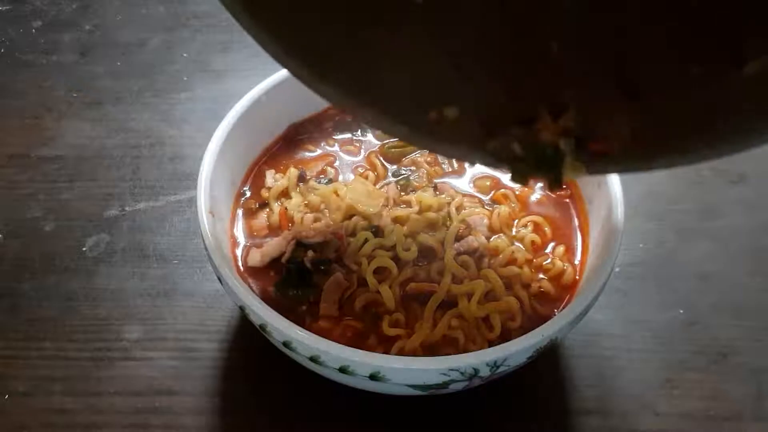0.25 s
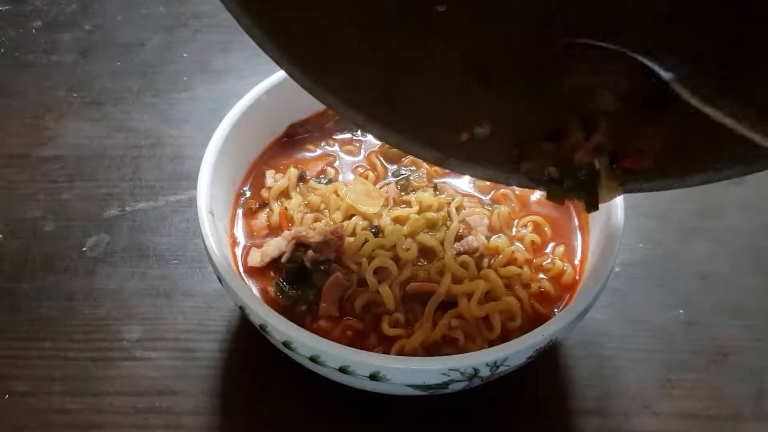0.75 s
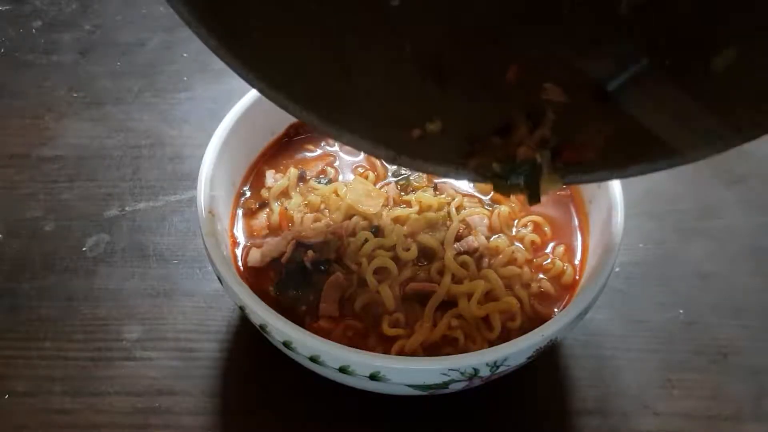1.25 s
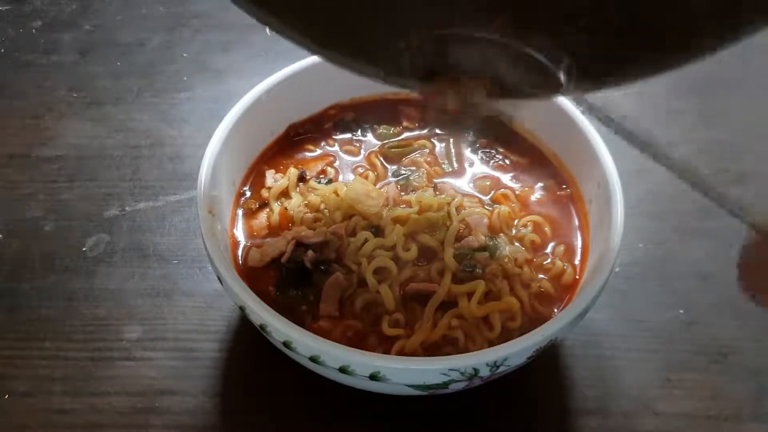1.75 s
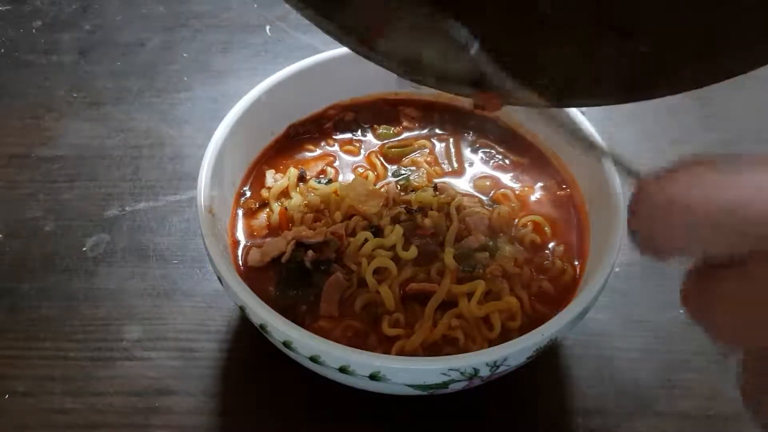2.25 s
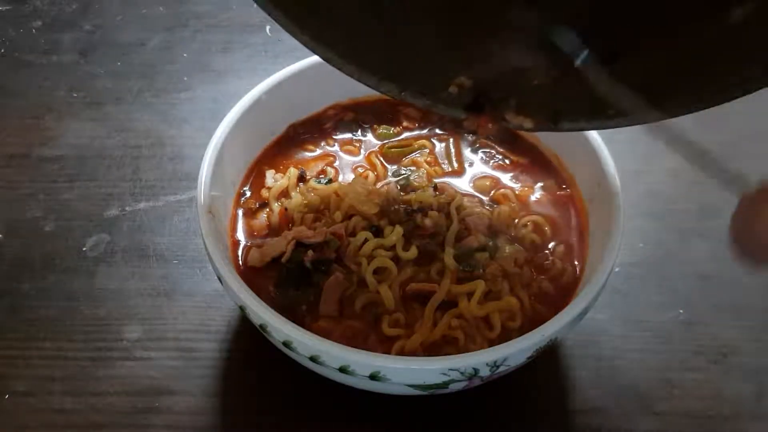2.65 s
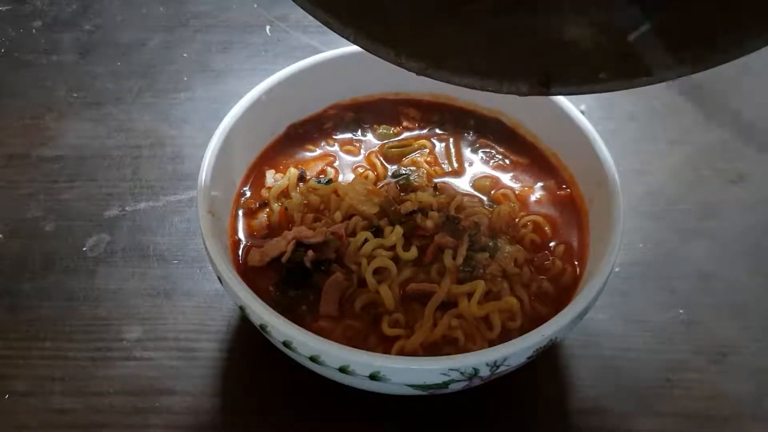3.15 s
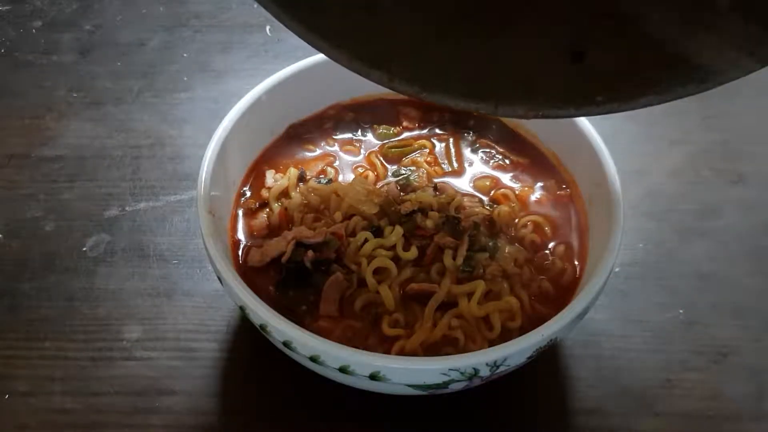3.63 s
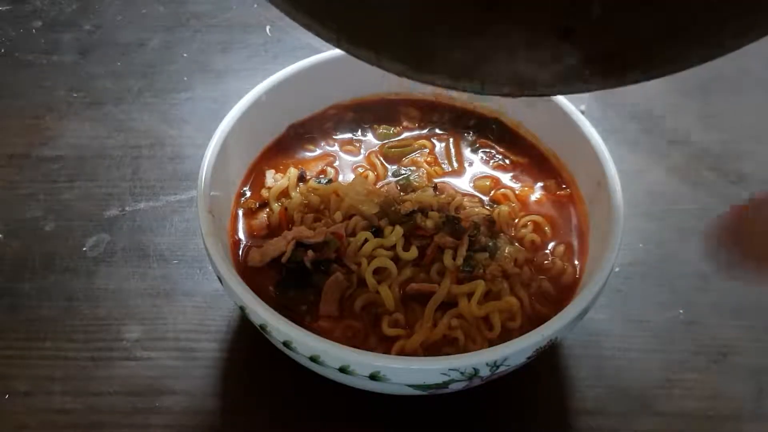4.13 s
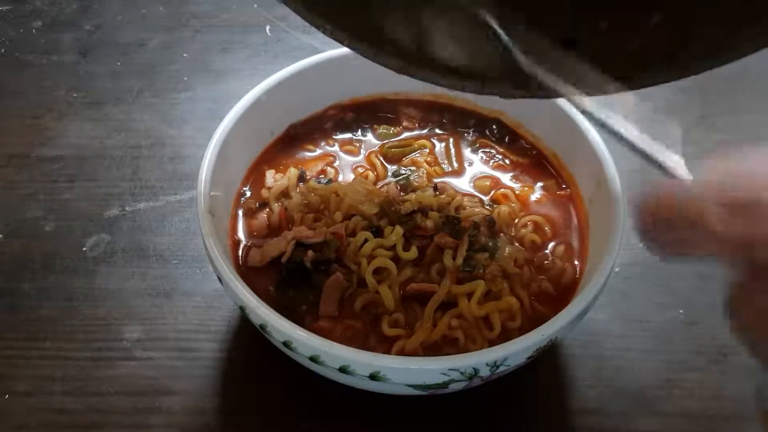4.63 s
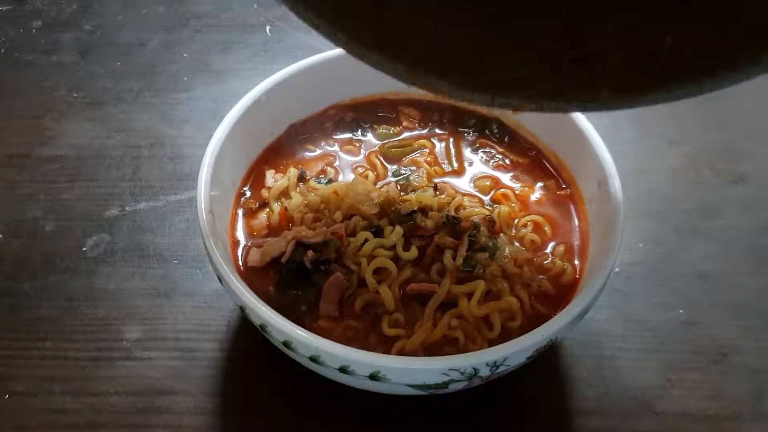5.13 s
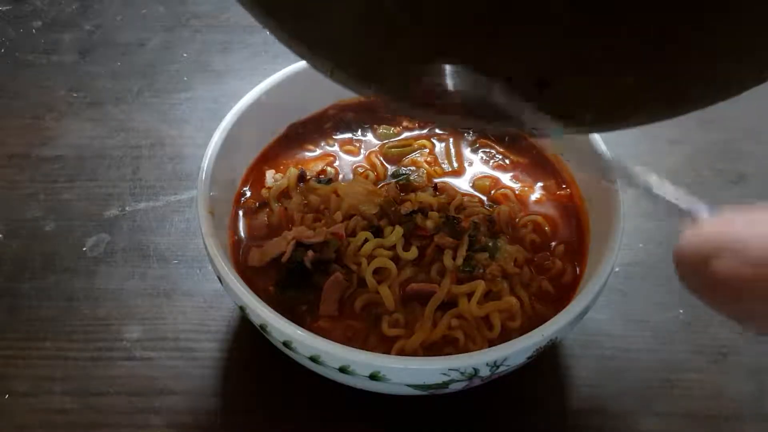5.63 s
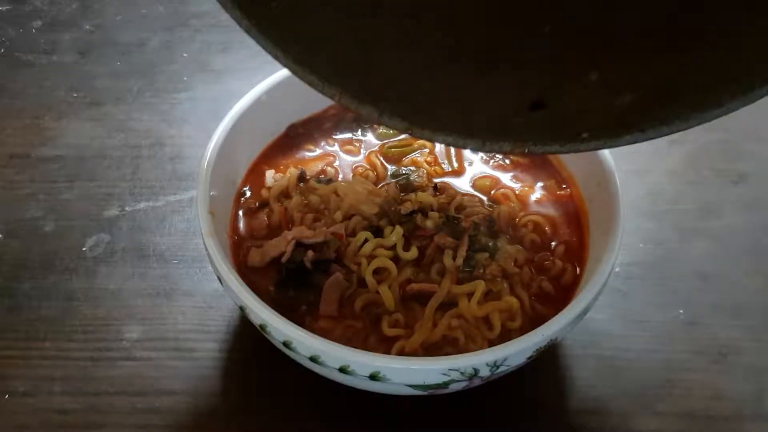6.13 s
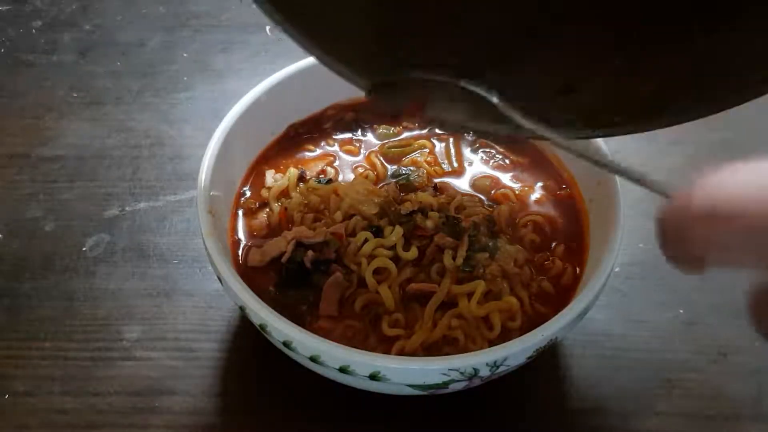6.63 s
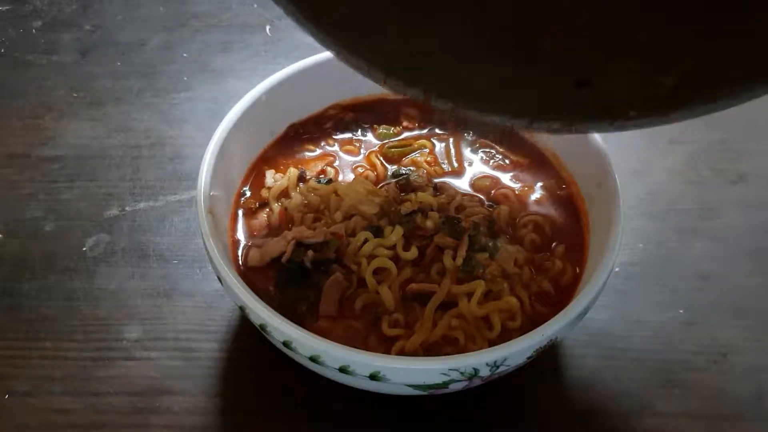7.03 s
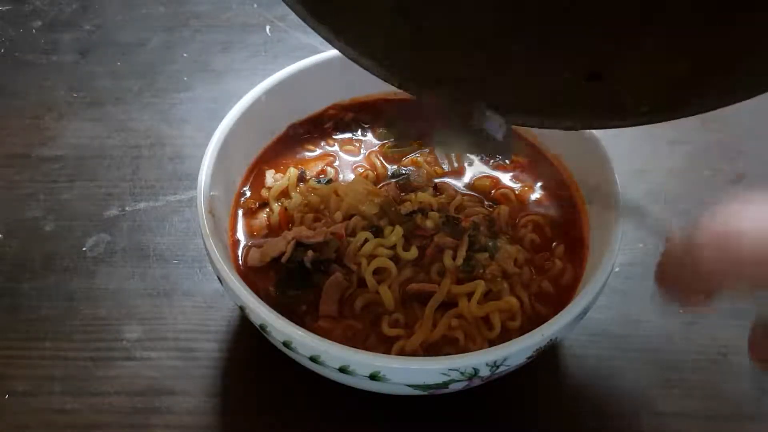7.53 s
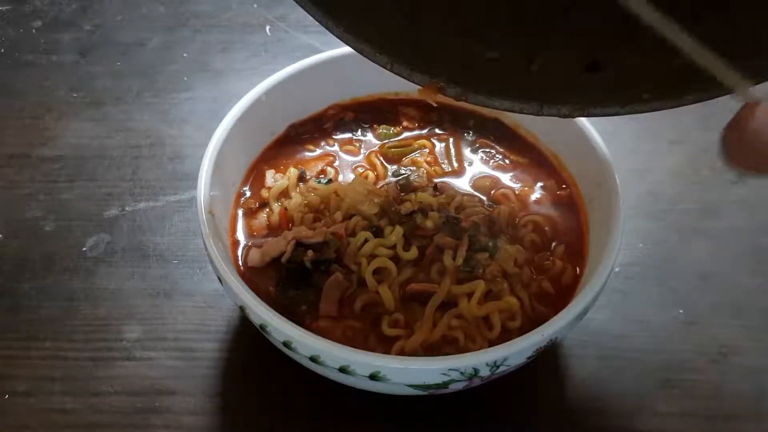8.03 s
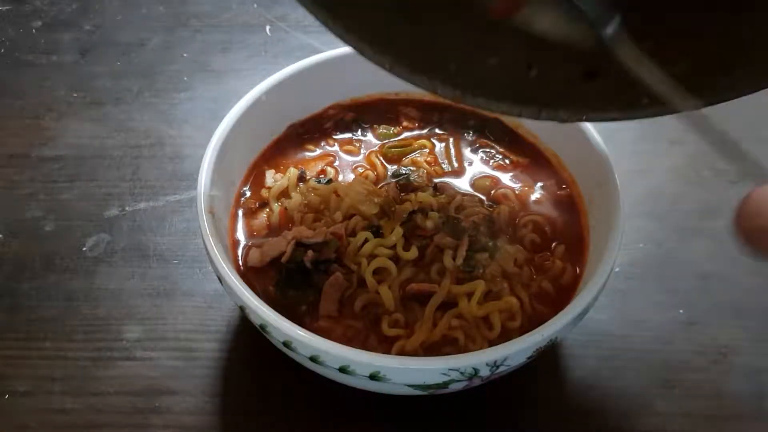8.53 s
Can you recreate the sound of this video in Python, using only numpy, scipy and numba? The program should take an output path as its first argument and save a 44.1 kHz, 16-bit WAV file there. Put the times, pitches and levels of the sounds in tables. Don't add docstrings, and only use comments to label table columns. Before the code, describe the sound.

Close stereo pickup in a small kitchen. After a faint wet slither of noodles, a steel spoon strikes a tilted thin metal pot roughly every half second, each clank followed by a short gritty scrape and brief metallic ring. Around the middle the strokes grow harsher, then two hollow, rumbling scoops follow with wider gaps. A last sharp clank, then a sleeve rustles over faint room hiss.

```python
import sys
import numpy as np
from scipy import signal
from scipy.fft import rfft, irfft, next_fast_len
from scipy.io import wavfile
from scipy.ndimage import map_coordinates
from numba import njit

SR = 44100
rng = np.random.default_rng(int(sys.argv[2]) if len(sys.argv) > 2 else 0)


def boost(x):
    u = np.asarray(x, float) / 20
    return 10 ** u


def generate_wav(signal):
    frames = np.transpose(np.atleast_2d(signal))
    scaled = np.clip(frames, -1, 1) * 32767
    pcm = np.round(scaled).astype(np.int16)
    wavfile.write(sys.argv[1], SR, pcm)


N = 387179


def gesture(start, top, end, db, rise, sag, release):
    t = np.arange(0, N / SR + .002, .001)[:, None]
    shape = db - rise * np.maximum(top - t, 0) - sag * np.maximum(t - top, 0)
    shape = shape - release * np.maximum(t - end, 0)
    shape = shape - 4000 * np.maximum(start - t, 0)
    gain = boost(np.maximum(shape, -200)).sum(axis=1)
    return np.interp(np.arange(N) / SR, t[:, 0], gain)


def wander(depth_db, step_s):
    knots = np.arange(0, N / SR + 1, step_s)
    gain = boost(depth_db * rng.standard_normal(N // 100)[:len(knots)])
    return np.interp(np.arange(N) / SR, knots, gain)


def rms_one(x):
    return x / np.sqrt(np.mean(x ** 2) + 1e-20)


def at_hz(points, hz):
    points_hz, values = np.transpose(points)
    return np.interp(np.log(hz), np.log(points_hz), values)


def colour(size, spectrum):
    hz = np.maximum(np.arange(size // 2 + 1) * SR / size, 1)
    below = np.maximum(np.log2(spectrum[0][0] / hz), 0)
    above = np.maximum(np.log2(hz / spectrum[-1][0]), 0)
    return hz, boost(at_hz(spectrum, hz) - 120 * (below + above))


# frequency in Hz, left-right likeness 0 to 1.
LIKENESS = [(60, 0.92), (300, .93), (700, 0.099), (1400, .1), (4000, 0.055)]


def hiss(spectrum, grain_db=0.0):
    grains = boost(grain_db * np.minimum(rng.exponential(1, N), 5))
    size = next_fast_len(N)
    mid, side = rfft(grains * rng.standard_normal((2, N)), size)
    hz, gain = colour(size, spectrum)
    alike = np.clip(at_hz(LIKENESS, hz), 0, 1)
    both = np.sqrt(1 + alike) * mid + np.sqrt(1 - alike) * side * [[1], [-1]]
    return rms_one(irfft(both * gain, size)[:, :N])


def reshape(x, gain):
    hz, s, spectra = signal.stft(x, SR, nperseg=512)
    return signal.istft(spectra * gain(hz[:, None], s), SR, nperseg=512)[1][:, :N]


def patchy(x, depth_db, width_hz, length_s):
    field = rng.standard_normal((200, 800))

    def gain(hz, s):
        spots = np.broadcast_arrays(np.minimum(hz / width_hz, 198), np.minimum(s / length_s, 798))
        return boost(depth_db * map_coordinates(field, spots, order=1))

    return rms_one(reshape(x, gain))


# time in seconds, spoon clank in dB, pot in dB,
# height from -2 floor to +2 lip, place around the wall from -2 to +2.
KNOCKS = [(0.446, -7, -24.5, 2.5, -0.9), (1.0227, -19.0, -35, 0.52, -1.23),
          (1.605, -12.5, -37.5, -0.37, 0.42), (2.0786, -12, -33.5, -0.6, 1.2),
          (2.59, -17.0, -36, 0.1, 0.16), (3.1003, -6.5, -32.5, -0.47, 0.091),
          (3.5289, -4.5, -28, 0.42, -0.47), (4.0534, -5.0, -28.5, -0.63, 1.16),
          (4.4417, -6, -30, 0.38, -0.25), (5.002, -8, -27, 0.12, 0.028),
          (6.0719, -16.5, -28.5, -2.2, -0.53), (6.9311, -23.5, -36.5, -2, -1.76),
          (8.1659, -3, -32, 2.32, -0.69)]
BOUNCES = [(1.1443, -27.0, -36, 0.44, -0.2), (3.1171, -26.5, -43.5, -0.092, 2.5),
           (3.2189, -18, -37, -2.16, 2), (3.704, -15, -39, -0.93, 0.8), (3.7941, -44.5, -42, 0.042, 1.1),
           (4.128, -17, -38, -0.98, 1.14), (4.6216, -29, -52.5, -0.52, 2.2),
           (5.4226, -36, -55.5, 0.22, 1.46), (6.1633, -27.0, -29, -2.93, -1.1),
           (6.2294, -38, -28.5, 0.31, -0.7), (6.3194, -29, -34.5, -1.4, -0.9),
           (6.3564, -64.0, -40.5, -0.2, -2.46)]


def blows():
    return np.vstack([KNOCKS, BOUNCES]).T


def clicks(s, db):
    out = np.zeros(N)
    at = (s * SR).astype(int)
    out[at - round(.003 * SR)] = .06 * boost(db)
    out[at] = 0.68 * boost(db)
    out[at + round(.0012 * SR)] = 1.66 * boost(db)
    return out


CATCH_S = .011


def smeared(s, db, hz):
    t, landed = np.arange(round(.06 * SR)) / SR, len(KNOCKS)
    run = np.exp(-t / CATCH_S)
    run = 2 * run * np.cos(2 * np.pi * hz * t) / run.sum()
    bounces = signal.fftconvolve(clicks(s[landed:], db[landed:]), run)[:N]
    return clicks(s[:landed], db[:landed]) + bounces


LIP_HEIGHT, LIP_LOSS_DB = 0.29, 14


def lip_loss_db(height):
    return LIP_LOSS_DB * np.maximum(height - LIP_HEIGHT, 0)


# start in seconds, fastest in seconds, lift in seconds,
# edge grit in dB, weight on the wall in dB.
STROKES = [(0.462, 0.64, 0.72, -32.5, -34.5), (1.065, 1.251, 1.317, -36.5, -39),
           (1.637, 1.7, 1.805, -45, -46.5), (2.096, 2.241, 2.282, -34, -38), (2.605, 2.72, 2.81, -50, -49),
           (3.126, 3.201, 3.294, -33.5, -33.5), (3.529, 3.605, 3.75, -33.5, -36.5),
           (3.694, 3.675, 3.88, -36.5, -36), (4.1, 4.13, 4.2, -38.5, -44), (4.444, 4.5, 4.58, -42.5, -46),
           (4.619, 4.621, 4.66, -44.5, -57), (5.12, 5.315, 5.36, -32.5, -32.5),
           (5.428, 5.459, 5.64, -26.5, -42), (6.119, 6.24, 6.33, -40.5, -32.5),
           (6.401, 6.5, 6.72, -43, -42), (6.564, 6.605, 6.64, -28.5, -39.5),
           (6.995, 7.115, 7.25, -44.5, -29), (7.246, 7.408, 7.57, -36, -36.5),
           (7.432, 7.439, 7.52, -28.5, -56), (8.175, 8.193, 8.33, -31, -61)]
BUILD_DB_PER_S, SLOW_DB_PER_S, LIFT_DB_PER_S = 60.5, 92.5, 700
WEIGHT_BUILDS_DB_PER_S, WEIGHT_EASES_DB_PER_S, WEIGHT_LEADS_S = 25, 20, .04
RASP_DB, HOLLOW_DB = -6, -18
RASP_FROM_EDGE_DB = -8
SKID_T60_S, SKID_EDGE_DB, SKID_WALL_DB, SKID_RASP_DB = 0.15, -27, 2, -2.5
SKID_HOLLOW_DB, HOLLOW_T60_S, SKID_AROUND_DB = 2.5, 0.17, -6


def skid(s, db, delay_s, t60_s):
    return gesture(s + delay_s, s + delay_s, s + 1, db, 0, 60 / t60_s, 0)


def drags():
    start, fastest, lift, grit_db, weight_db = np.transpose(STROKES)
    edge = gesture(start, fastest, lift, grit_db, BUILD_DB_PER_S, SLOW_DB_PER_S, LIFT_DB_PER_S)
    weight = gesture(start, (start + fastest) / 2, lift - WEIGHT_LEADS_S, weight_db,
                     WEIGHT_BUILDS_DB_PER_S, WEIGHT_EASES_DB_PER_S, LIFT_DB_PER_S)
    s, clank_db, pot_db, height, around = np.transpose(KNOCKS)
    deep = skid(s, pot_db - lip_loss_db(height), .005, HOLLOW_T60_S)
    bright = skid(s, clank_db, .012, SKID_T60_S)
    heavy = skid(s, pot_db, .012, SKID_T60_S)
    flat = skid(s, pot_db + SKID_AROUND_DB * around, .012, SKID_T60_S)
    hollow = boost(HOLLOW_DB) * weight + boost(SKID_HOLLOW_DB) * deep
    wall = weight + boost(SKID_WALL_DB) * flat
    rasp = boost(RASP_DB) * weight + boost(SKID_RASP_DB) * heavy + boost(RASP_FROM_EDGE_DB) * edge
    return edge + boost(SKID_EDGE_DB) * bright, hollow, wall, rasp


# start in seconds, end in seconds, pressure in dB.
PRESS = [(0.563, 0.733, -19), (1.03, 1.3, -14), (3.1, 3.277, -19.5), (3.658, 3.86, -7),
         (4.08, 4.189, -28.5), (4.459, 4.58, -15.5), (4.6, 4.646, -12), (5.028, 5.106, -5), (5.1, 5.4, -12),
         (5.433, 5.594, -15.5), (6.079, 6.117, 1.5), (6.1, 6.42, -6.5), (6.942, 7.018, 0.5),
         (6.963, 7.115, -5.5), (7.41, 7.441, -2), (7.444, 7.53, -11.5), (8.171, 8.45, -4.5)]
PRESS_EASES_DB_PER_S, LET_GO_DB_PER_S = 10, 600.5
DRAG_PRESS_DB = -18


def pressure(damping_per_s, stiffen_hz):
    start, end, db = np.transpose(PRESS)
    load = gesture(start, start, end, db, 0, PRESS_EASES_DB_PER_S, LET_GO_DB_PER_S)
    touch, _, lift = np.transpose(STROKES)[:3]
    dragged = gesture(touch, touch, lift, DRAG_PRESS_DB, 0, 0, LET_GO_DB_PER_S)
    load = load + (stiffen_hz > 0) * dragged
    return np.exp((2j * np.pi * stiffen_hz * load ** 2 - damping_per_s * load) / SR)


def grit(per_s, spread_db):
    sizes = boost(spread_db * np.minimum(rng.exponential(1, N), 5)) * rng.choice([-1, 1], N)
    return rms_one(sizes * (rng.random(N) < per_s / SR))


@njit
def swing(force, pole, bend, left, right):
    out, state = np.zeros((2, len(force))), 0j
    for i in range(len(force)):
        state = pole * bend[i] * state + force[i]
        out[0, i], out[1, i] = (state * left).imag, (state * right).imag
    return out


def ring(force, hz, t60, lead, pan_db, bend):
    pole = boost(-60 / (t60 * SR)) * np.exp(2j * np.pi * hz / SR)
    port = np.exp(.5j * lead) * boost(pan_db / 2)
    return swing(force + 1e-18, pole, bend, port, 1 / port)


def steady(t60):
    return 2 * np.sqrt(np.log(1000) / (t60 * SR))


POT_HZ = [577, 690, 790, 1109, 1218, 1888, 2276, 2517, 2876, 2998, 3035, 4060, 4201, 4375]
# knock in dB, drag in dB, T60 in seconds, left lead in radians,
# left-right in dB, ring number.
POT = [(1.5, 2, 0.46, 0.15, -5, 0), (-3, -22, 0.029, 2, -3, 8), (-6, -22.5, 0.055, -3.5, -2.5, 8),
       (7.5, -2.5, 0.24, 4.5, -0.5, 1), (-2, -16.5, 0.36, 4, 1.5, 1), (6, -8, 0.47, 2.5, 1.5, 2),
       (0, -10.5, 0.1, -2, 1, 4), (-1, -15.5, 0.19, -2.5, 0, 3), (0, -17.5, 0.14, 4, 1, 5),
       (5.5, -19, 0.19, 7.5, 1, 6), (-4.5, -12.5, 0.13, -3.5, 6, 6), (-8.5, -14, 0.1, 0.45, 6.5, 7),
       (2.5, -6, 0.17, 2, 2, 7), (-10.5, -17, 0.16, -3, -4, 7)]
# level in dB, dB per unit of height,
# dB per unit around the wall.
RINGS = [(8, -3, -1.44), (-0.75, -2.5, -3), (-1.5, 5, 3.5), (-11.5, -1.5, 8.5), (6, -3.0, 1),
         (-1.5, 7.5, 0.0), (-3, 5, 1.5), (4, 1.5, -4.5), (-1.73, -5.5, -4.5)]


def pot(wall, rasp):
    s, _, pot_db, height, around = blows()
    slips, out = grit(6000, spread_db=3.0), 0
    press = pressure(damping_per_s=75, stiffen_hz=0)
    stiff = pressure(damping_per_s=33, stiffen_hz=58.0)
    for hz, (knock_db, drag_db, t60, lead, pan_db, number) in zip(POT_HZ, POT):
        lowest = hz == POT_HZ[0]
        feed = wall if hz < 2000 else rasp
        drag = slips * wander(depth_db=6.5, step_s=0.05) * feed * boost(drag_db) * steady(t60)
        ring_db, up_db, around_db = RINGS[int(round(number))]
        place_db = ring_db + up_db * height + around_db * around - lip_loss_db(height) * lowest
        struck = smeared(s, pot_db + place_db + knock_db, hz)
        out = out + ring(struck + drag, hz, t60, lead, pan_db, stiff if lowest else press)
    no_bass = signal.butter(4, 400, "high", fs=SR, output="sos")
    return signal.sosfilt(no_bass, out)


CLANK_HZ = [4890, 5390, 5555, 5840, 6090, 6238, 6385, 6570, 6860, 7250, 7490, 8100, 10700]
# level in dB, T60 in seconds.
CLANK = [(-6, 0.036), (1.5, .08), (-1.5, .1), (0.5, 0.02), (-14, .08), (-6.5, 0.089), (6, 0.036),
         (-14, 0.011), (-2, 0.087), (-3, 0.018), (-12, .06), (-12, .04), (-10, 0.0086)]
# time in seconds, spoon clank in dB.
TICKS = [
    (3.796, -26),
    (5.3976, -23),
    (5.465, -6),
    (6.571, -26),
    (7.435, -22.5),
    (8.601, -48.5),
]


def spoon(edge):
    slips, out = grit(4200, spread_db=4.5), 0
    press = pressure(damping_per_s=40, stiffen_hz=0)
    s, clank_db = np.hstack([blows()[:2], np.transpose(TICKS)])
    chance = rng.standard_normal((len(s), len(CLANK)))
    for k, (hz, (db, t60)) in enumerate(zip(CLANK_HZ, CLANK)):
        struck = clicks(s, clank_db + db - 15.5 + 5 * chance[:, k])
        drag = slips * wander(depth_db=4.5, step_s=0.07) * edge * boost(db - 10.5) * steady(t60)
        out = out + ring(struck + drag, hz, t60, rng.uniform(-7, 2.2), rng.normal(0, 3.8), press)
    return signal.sosfilt(signal.butter(4, 3800, "high", fs=SR, output="sos"), out)


# frequency in Hz, density in dB per Hz.
GRIT = [(2500, -32), (3600, -28), (4200, -11), (5000, -9.5), (6400, 0), (7400, -7), (8500, -13),
        (11000, -16), (14000, -24), (16500, -38)]
RASP = [(900, -9), (1500, -4.5), (2500, -5.5), (3100, -9.5), (3500, -21), (4500, -9)]
HOLLOW = [(120, -29.5), (200, -14.5), (350, -2.5), (550, 1.5), (800, -25), (1200, -6.5)]
GRIT_NOISE_DB, RASP_NOISE_DB = 1.5, -11


def scrape(edge, hollow, rasp):
    edge_hiss = patchy(hiss(GRIT, grain_db=4.0), depth_db=7, width_hz=300, length_s=.03)
    edge_hiss = edge_hiss * edge * boost(GRIT_NOISE_DB) * wander(depth_db=3.5, step_s=.006)
    wall_rasp = patchy(hiss(RASP, grain_db=6.0), depth_db=5.5, width_hz=200, length_s=.05)
    wall_rasp = wall_rasp * rasp * boost(RASP_NOISE_DB)
    return edge_hiss + wall_rasp + hollow * hiss(HOLLOW, grain_db=5.0)


def burst(db, spectrum, t60):
    fall = signal.lfilter([1], [1, -boost(-60 / (t60 * SR))], clicks(blows()[0], db))
    return signal.lfilter([.03], [1, -.97], fall) * hiss(spectrum)


SLAP_T60_S, SOFT_SLAP_DB = .07, -12


def contact():
    _, clank_db, pot_db, height, _ = blows()
    bounce = np.arange(len(height)) >= len(KNOCKS)
    crack = burst(clank_db - 8.0, GRIT, .04)
    slap = burst(pot_db - 3.1 * height - 0.5 + SOFT_SLAP_DB * bounce, RASP, SLAP_T60_S)
    thud = burst(clank_db - 43.5, [(30, -5.5), (90, -1), (300, -1)], .12)
    return crack + slap + thud


# start in seconds, loudest in seconds, end in seconds,
# level in dB, first resonance in Hz.
POCKET = [
    (0.499, 0.632, 0.68, -38.5, 417),
    (1.123, 1.2, 1.32, -37, 397.5),
    (5.093, 5.212, 5.2, -23.5, 700),
    (6.082, 6.2, 6.47, -22.5, 780),
    (6.38, 6.444, 10, -39, 430),
    (6.949, 7.051, 7.2, -24.5, 830),
    (7.22, 7.324, 7.9, -34.5, 470),
]
POCKET_SINKS_HZ_PER_S, POCKET_SWELL_DB_PER_S, POCKET_FADE_DB_PER_S = 1000, 200, 139


def pocket():
    start, top, end, db, first_hz = np.transpose(POCKET)
    last_hz = np.maximum(first_hz - POCKET_SINKS_HZ_PER_S * (end - start), 320)
    s, centre_hz = np.c_[start, end].ravel(), np.c_[first_hz, last_hz].ravel()

    def peak(hz, t):
        return 1 / (1 + ((hz - np.interp(t, s, centre_hz)) / 95) ** 2)

    level = gesture(start, top, end, db, POCKET_SWELL_DB_PER_S, POCKET_FADE_DB_PER_S, LIFT_DB_PER_S)
    return level * rms_one(reshape(hiss([(250, -18.5), (1400, 4)], grain_db=4.5), peak))


# frequency in Hz, T60 in seconds.
KITCHEN = [(100, 0.69), (500, 0.4), (2000, 0.35), (6000, 0.24), (14000, 0.21)]
KITCHEN_DB = -6


def kitchen(x):
    t, tail = np.arange(SR // 2) / SR, 0
    white = np.array([[1, .5], [.5, 1]]) @ rng.standard_normal((2, len(t)))
    for low in 60 * 2 ** np.arange(8):
        band = signal.sosfilt(signal.butter(2, [low, 2 * low], "band", fs=SR, output="sos"), white)
        tail = tail + band * boost(-60 * t / at_hz(KITCHEN, np.sqrt(2) * low))
    tail = tail * np.clip(t / 0.0069, 0, 1)
    tail = tail / np.sqrt(np.sum(tail ** 2))
    return boost(KITCHEN_DB) * signal.fftconvolve(x[:1], tail, axes=1)[:, :N]


# start in seconds, loudest in seconds, end in seconds, level in dB.
RUSTLE = [
    (5.819, 5.86, 5.7, -69),
    (7.842, 7.891, 8.0, -65.5),
    (8.594, 8.6, 9.47, -53),
]
# frequency in Hz, density in dB per Hz.
CLOTH = [(710, -68.5), (1200, -50), (1590, -9.5), (3220, -4), (6720, -12.5), (8080, -21.5), (14500, -13.5),
         (16000, -29.5)]


def sleeve():
    return gesture(*np.transpose(RUSTLE), 83, 90, 500) * hiss(CLOTH, grain_db=5.0)


# start in seconds, loudest in seconds, end in seconds, level in dB.
SLIDE = [
    (0.0, .4, .44, -61),
]
# frequency in Hz, density in dB per Hz.
NOODLES = [(88, -41), (150, -12), (420, -2.5), (595, -8), (844, -2.5), (1870, -31), (2860, -8), (3690, -30),
           (15500, -24)]


def noodles():
    return gesture(*np.transpose(SLIDE), 22, 30, 500) * hiss(NOODLES, grain_db=3.0)


DUCK_DB, DUCK_BACK_DB_PER_S = 11, 12.5


def ducking():
    t, s = np.arange(N) / SR, np.r_[-9, np.array(KNOCKS)[:, 0]]
    since = t - s[np.searchsorted(s, t) - 1]
    return boost(-np.maximum(DUCK_DB - DUCK_BACK_DB_PER_S * since, 0))


# low in dB, hiss in dB.
TONE = (-74, -79.5)
# frequency in Hz, density in dB per Hz.
TONE_LOW = [(15, -43), (25, -23.5), (101, -3.5), (326, -20), (363, -19.5), (398, -14), (730, -14),
            (926, -14), (2000, -30), (2600, -64), (4400, -120)]
TONE_HISS = [(1180, -46.5), (2000, -2.5), (4020, -4.5), (5820, -6.5), (6410, -7), (9050, -12.5),
             (15100, -2), (16100, -8), (16500, -22)]
WHINE_HZ, WHINE_DB = 14610, -8


def room_tone():
    low_db, hiss_db = TONE
    whine = boost(WHINE_DB) * np.sin(2 * np.pi * WHINE_HZ * np.arange(N) / SR)
    tone = boost(low_db + 7.5) * hiss(TONE_LOW) + boost(hiss_db + 8.5) * (hiss(TONE_HISS) + whine)
    return tone * ducking()


def scene():
    edge, hollow, wall, rasp = drags()
    close = pot(wall, rasp) + spoon(edge) + contact() + scrape(edge, hollow, rasp) + pocket()
    return close + kitchen(close) + sleeve() + noodles() + room_tone()


def top_cut(x):
    return signal.sosfilt(signal.butter(12, 16990, fs=SR, output="sos"), x)


CUTOFF_HZ = 17000


def record(dry):
    rounded = 0.82 * np.tanh(dry / 1.173)
    low_pass = signal.cheby2(12, 70, CUTOFF_HZ, fs=SR, output="sos")
    return top_cut(signal.sosfilt(low_pass, rounded))


dry = scene()
out = record(dry)
generate_wav(out)
```